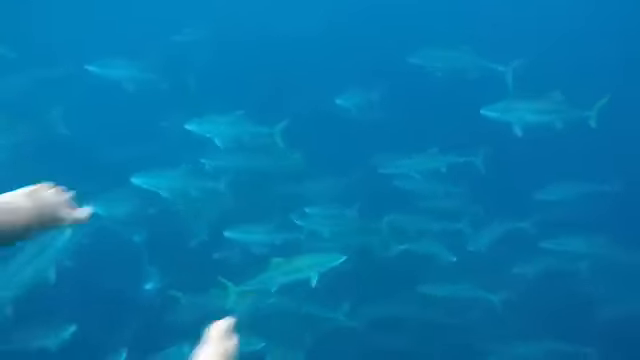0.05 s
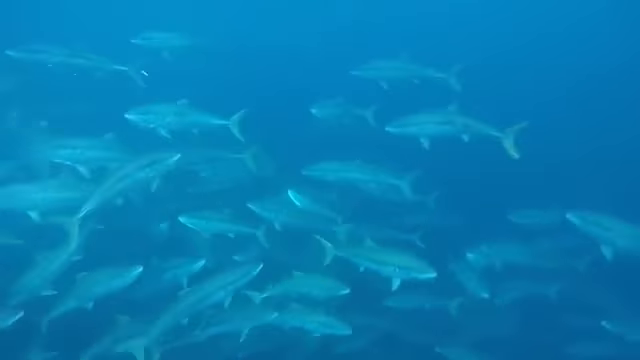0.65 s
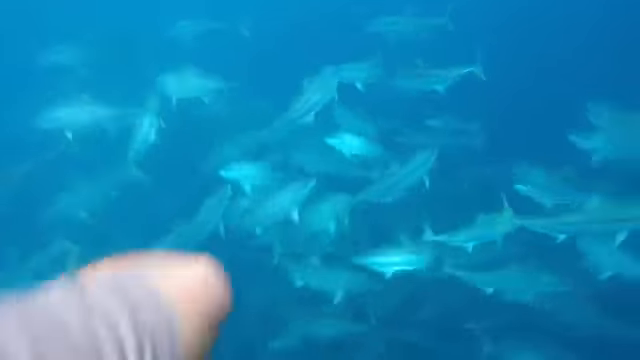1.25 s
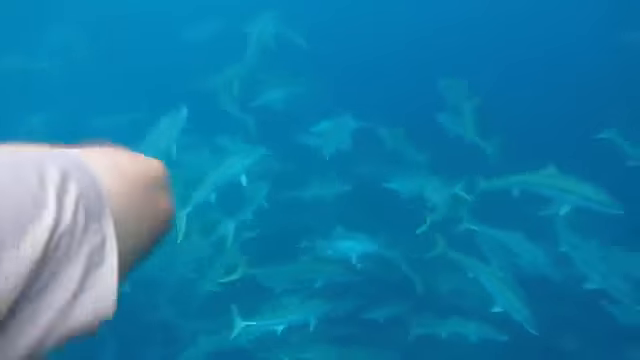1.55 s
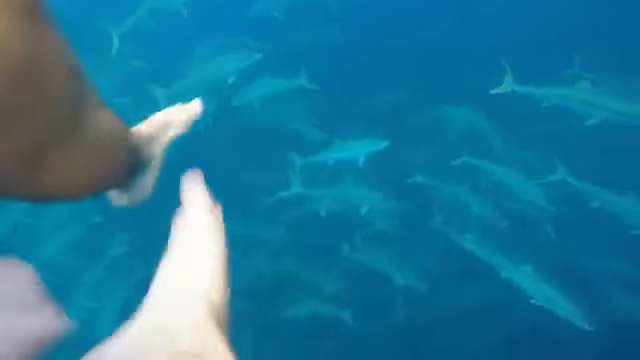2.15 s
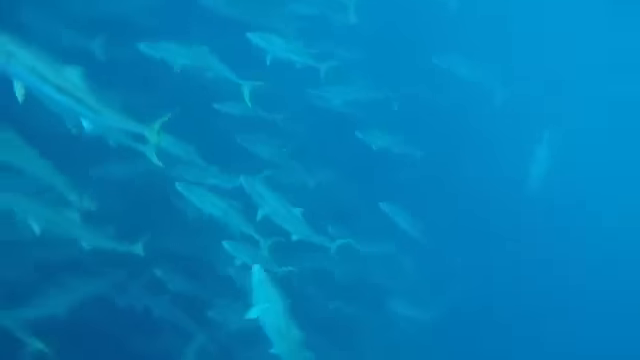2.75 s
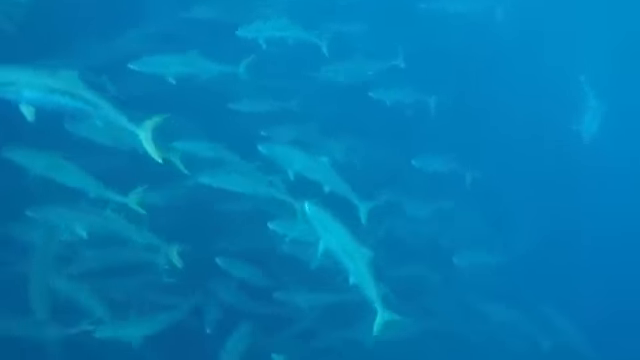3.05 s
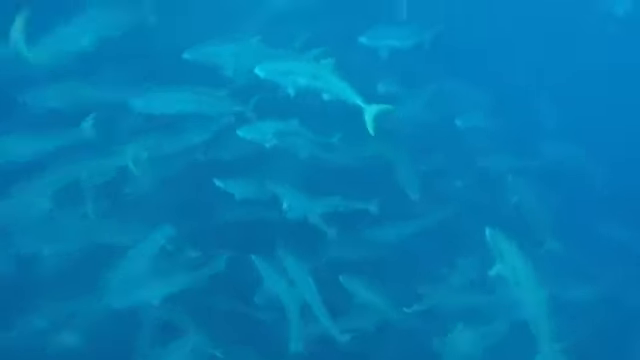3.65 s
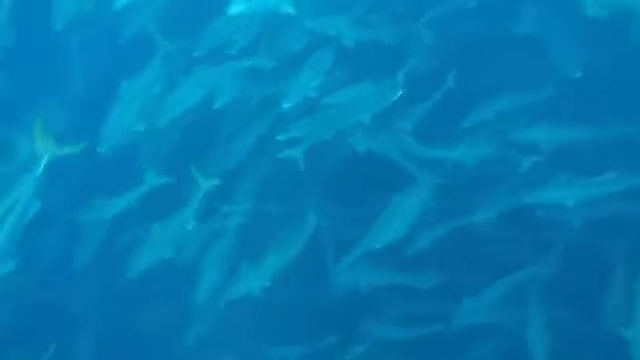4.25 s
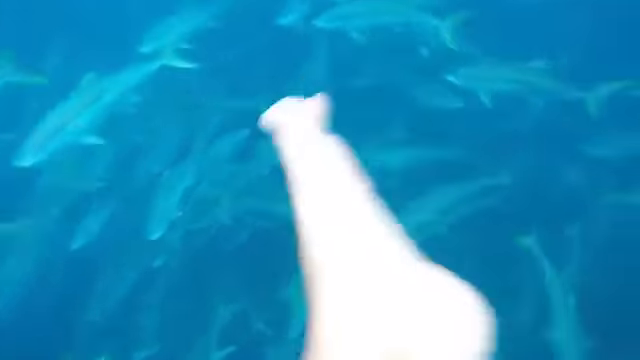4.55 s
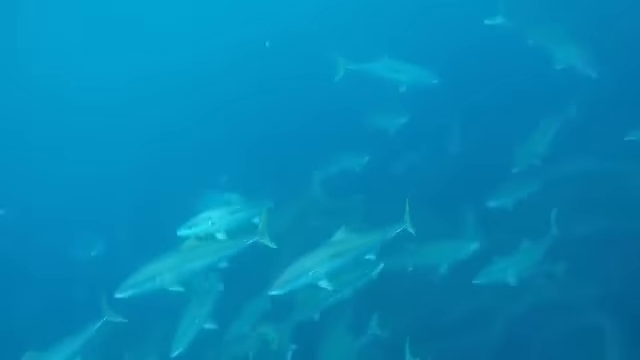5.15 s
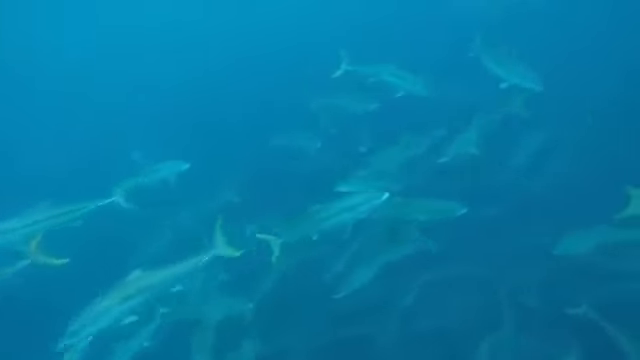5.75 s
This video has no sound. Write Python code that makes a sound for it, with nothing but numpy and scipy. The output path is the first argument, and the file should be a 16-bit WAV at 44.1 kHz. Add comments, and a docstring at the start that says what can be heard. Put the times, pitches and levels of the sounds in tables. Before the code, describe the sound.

A low, muffled underwater rumble runs throughout, heard from a camera in a waterproof case close to a kicking swimmer. Each kick brings an uneven surge and a hollow wash of churned water. Small sharp ticks are scattered all along over a faint, fine fizz.

After a single glug at the start, a bunch of louder glugs and high bubble pips comes from about 0.8 to 1.5 seconds, with the strongest churning near 1.3. Around 2 seconds there is a splutter of small bubbles, a swell of crackle and a short gurgle. The water eases a little, then surges again with soft low bumps and more glugs between 3.1 and 4.4 seconds, heaviest just after 4. At about 4.6 a foot sweeps close with a brief bubbly rush. From 5 seconds the rumble subsides, leaving light fizz and a couple of ticks.

```python
"""Under the sea, a swimmer kicks near a camera in a waterproof case.
Each kick sways the pressure on the case and churns the water, and once a foot sweeps close by.
Pockets of air glug and small bubbles pip, each ringing like a tiny bell. Sharp ticks and the fine
crackle of bubble clouds reach the microphone, coloured by the way the case rings."""
import sys
import numpy as np
from scipy import signal
from scipy.fft import rfft, irfft, next_fast_len
from scipy.io import wavfile
from scipy.ndimage import uniform_filter1d, map_coordinates

SR = 44100
rng = np.random.default_rng(int(sys.argv[2]) if len(sys.argv) > 2 else 0)


def bounce(signal):
    """Save signal as a 16-bit WAV file at the path given by the first command-line argument."""
    frames = np.transpose(np.atleast_2d(signal))
    limited = np.clip(frames, -1, 1)
    pcm = np.round(limited * 32767).astype(np.int16)
    wavfile.write(sys.argv[1], SR, pcm)


N = 255339
TREBLE_HZ = 4600  # where the pips and fizz end and the finest crackle begins
PUSH_RISE_S, CHURN_RISE_S, CLOUD_RISE_S = .51, .38, .36  # every rise or fade time here spans 60 dB

# kicks and sweeps of the limbs: t/s, push level/dB, churn level/dB, fade/s
KICKS = [(.1, -35.5, -42, 1.6), (.88, -41, -41, 2), (1.07, -28.5, -42, 0.6), (1.251, -24.5, -29, 1),
         (1.56, -28.5, -38, 0.7), (1.77, -39, -36.5, 2), (1.94, -24, -39, 0.67), (2.14, -28.5, -33.5, 2.5),
         (2.76, -34, -45, 3), (3.14, -33, -37.5, 1.3), (3.6, -29, -44, 1.5), (3.76, -36, -39.5, 1.7),
         (4.05, -20, -38.5, 0.5), (4.35, -28, -44, 1), (4.591, -22, -39, 0.65), (4.82, -29.5, -49, 1.9),
         (5.2, -35, -51, 2.5)]
# tone of the swaying pressure: f/Hz, level/dB
SWAY_TONE = [(12, -14.5), (28, 6.5), (52, -1), (75, -9), (125, -20), (450, -66)]
# soft bumps of water against the case: t/s, level/dB, f/Hz
WATER_BUMPS = [(1.047, -24, 51), (1.162, -27, 110), (3.228, -22, 82), (3.612, -27, 104), (3.745, -25, 73),
               (4.028, -19, 36), (4.095, -16.5, 42), (4.299, -20, 85), (4.326, -27, 185),
               (4.565, -19.5, 87), (5.14, -29, 89)]

def surge():
    """Swirls from the kicks press unevenly on the case; the strongest bump against it."""
    pushes = [(s, db, 1.3 * fade_s) for s, db, _, fade_s in KICKS]  # swirls outlast the churning
    level_db = swells(pushes, PUSH_RISE_S, calm_db=-43)
    sway = coloured(rng.standard_normal(N), lambda hz: amp(along(SWAY_TONE, hz)))
    strength = np.sqrt(np.abs(uniform_filter1d(sway ** 2, size=SR // 6)) + 1e-12)
    track = amp(level_db + 1.9 * wobble(16)) * sway / strength
    for s, db, hz in WATER_BUMPS:
        add(track, s, amp(db + 11.5) * bubble(hz, fade_s=3.8 / hz, climb_per_s=0, onset_cycles=.5))
    return track


# tone of churned water: f/Hz, level/dB
CHURN_TONE = [(70, -24), (140, 3), (240, -3.5), (400, -2.5), (670, 3), (830, -7), (1060, -19.5),
              (1800, -20), (4500, -46.5)]

def churn(level_db):
    """Stirred water makes a hollow, lumpy wash thick with tiny gulps."""
    gulps = swarm(per_s=260, low_hz=230, high_hz=914, cycles=13.2, spread_db=5.5)
    stirring = rng.standard_normal(N) + amp(-14.5) * gulps
    wash = unit(coloured(stirring, lambda hz: amp(along(CHURN_TONE, hz))))
    return amp(level_db + 2.3 * wobble(28)) * wash


# single large air pockets: t/s, level/dB, f/Hz, fade/s
AIR_POCKETS = [(0.142, -13.5, 520, 0.016), (.579, -33, 750, 0.044), (.866, -13.5, 564, 0.105),
               (.988, -16.5, 661, 0.11), (1.041, -7, 230, 0.016), (1.068, -26, 540, 0.062),
               (1.103, -10.5, 547, 0.03), (1.128, -16, 644, 0.1), (1.131, -23, 765, 0.061),
               (1.234, -11, 386, 0.045), (1.408, -5.5, 470, 0.01), (1.518, -22, 559, 0.12),
               (1.939, -15, 472, 0.018), (2.086, -8.5, 153, 0.03), (2.253, -21, 590, .05),
               (2.601, -25, 775, 0.018), (2.901, -26, 645, 0.042), (3.156, -20.5, 700, 0.07),
               (3.61, -17.5, 324, 0.024), (3.729, -17, 573, .06), (4.03, -13.5, 467, 0.028),
               (4.121, -23.5, 608, 0.038), (4.461, -22, 620, 0.013), (4.539, -22, 576, 0.052),
               (5.633, -28.5, 830, 0.017)]
# pockets that break into a run of bubbles: t/s, level/dB, middle f/Hz, length/s
BUBBLE_RUNS = [(.258, -28, 400, .03), (.883, -24, 600, .055), (2.082, -19.5, 410, .042),
               (2.15, -27, 600, .04), (3.094, -27, 570, .028), (3.705, -22.5, 540, .045)]

def glugs(bubbles_per_s=170, spread_octaves=.27):
    """Air pockets ring as one rising note or break into a gurgle; the case wall softens each start."""
    track = np.zeros(N)
    for s, db, hz, fade_s in AIR_POCKETS:
        add(track, s, amp(db) * bubble(hz, fade_s, climb_per_s=1.9, onset_cycles=.45))
    for s, db, middle_hz, length_s in BUBBLE_RUNS:
        run = rng.uniform(-1, 1, (20, 3))[:round(length_s * bubbles_per_s)]
        for k, (late, pitch, loud) in enumerate(run):
            hz = middle_hz * 2 ** (spread_octaves * np.sqrt(3) * pitch)
            ring = bubble(hz, fade_s=20 / hz, climb_per_s=3, onset_cycles=.7)
            add(track, s + (k + late / 2) / bubbles_per_s, amp(db + 2 * loud) * ring)
    wall = lambda hz: 1 / np.sqrt(1 + (hz / 930) ** 20) + amp(case_db(hz) - 12)
    return coloured(track * (1 + .22 * wobble(260)), wall)


# small bubbles: t/s, level/dB, f/Hz
SMALL_BUBBLES = [(.849, -23.5, 1890), (.899, -24, 3020), (0.981, -26, 1710), (1.104, -27, 1860),
                 (1.225, -22.5, 1920), (1.33, -26.5, 2590), (1.367, -23, 2230), (1.895, -23.5, 1650),
                 (1.905, -24, 1740), (1.929, -23, 1880), (1.929, -17.5, 3100), (1.941, -22, 3250),
                 (1.944, -19, 2660), (1.968, -20.5, 2800), (1.97, -28, 1390), (1.985, -27, 1780),
                 (2.031, -24, 2490), (2.179, -27, 1500), (2.267, -25.5, 1590), (3.703, -24, 1810),
                 (3.738, -21, 2180), (4.121, -26.5, 1400), (4.575, -21.5, 2180)]

def pips(echo_fade_s=.05):
    """Small bubbles splutter: wobbling walls roughen each ring and the cloud around scatters it."""
    track, t = np.zeros(N), np.arange(SR // 10) / SR
    for s, db, hz in SMALL_BUBBLES:
        ring = bubble(hz, fade_s=45 / hz, climb_per_s=5, onset_cycles=.3)
        echo = rng.standard_normal(len(t)) * amp(-60 * t / echo_fade_s)
        direct_and_echo = (t == 0) + amp(-8) * echo / np.linalg.norm(echo)
        add(track, s, amp(db) * signal.fftconvolve(ring, direct_and_echo))
    rough = track * (1 + .3 * wobble(1100))
    return coloured(rough, lambda hz: 1 / np.sqrt(1 + (hz / TREBLE_HZ) ** 10))


# loudness of the passing foot: t/s, level/dB
FOOT_SWEEP = [(4.49, -70), (4.54, -35), (4.6, -31), (4.68, -37.5), (4.86, -41.5), (5.02, -63)]
# tone of its stream: f/Hz, level/dB
STREAM_TONE = [(170, 0.5), (680, 1), (900, -8), (1180, -23), (2100, -11.5), (3000, -22), (12000, -65)]

def foot_rush():
    """A foot sweeps close by: a bubbly stream that swells quickly and slackens slowly."""
    level_db = np.interp(np.arange(N) / SR, *np.transpose(FOOT_SWEEP))
    bubbles = swarm(per_s=450, low_hz=250, high_hz=2500, cycles=14, spread_db=3)
    tone = lambda hz: amp(along(STREAM_TONE, hz))
    flow = unit(coloured(rng.standard_normal(N), tone))
    return amp(level_db) * unit(flow + unit(coloured(bubbles, tone)))


# sharp ticks and bright pin-prick snaps, heard through the case: t/s, level/dB, brightness/(dB per octave)
SHARP_TICKS = [(0.158, -37.5, -4.5), (0.317, -37, -3.5), (.372, -38, -3), (0.412, -33, 2.5),
               (0.787, -33.5, -1), (0.847, -29, -1), (1.05, -34, 1.5), (1.155, -38.5, 7), (1.225, -31, 4.5),
               (1.387, -27.5, 5), (1.512, -43, 11.5), (1.736, -37, 4), (1.775, -34, 3.5), (1.85, -35, 6.5),
               (1.861, -30, 5.5), (2.204, -31.5, 3), (2.334, -31, 3), (2.577, -28, 9), (2.793, -44.5, 12),
               (2.906, -33.5, -1), (2.981, -45, 15), (3.047, -32, .5), (3.439, -38.5, 4.5), (3.49, -38, -8),
               (3.564, -38.5, 8.5), (3.605, -40.5, 12.5), (3.696, -29.5, -4.5), (3.845, -44, 14),
               (4.057, -36.5, 0.5), (4.111, -27.5, 5), (4.195, -39, 4.5), (4.46, -33, -3.5), (4.611, -37, 3),
               (4.848, -40.5, 7), (5.03, -38.5, 5), (5.132, -39, -3), (5.485, -26, 2.5), (5.6, -31, 2.5)]

def ticks():
    """Each tick is a snap and a brief scatter off the surface, coloured by its own path to the case."""
    track, t = np.zeros(N), np.arange(SR // 6) / SR
    grid_hz = np.linspace(0, 16000, 48)
    for s, db, brightness in SHARP_TICKS:
        snap = 3 * (t == 0) + amp(-60 * t / .0042) * rng.standard_normal(len(t))
        scatter = (amp(-13 - 60 * t / .024) + amp(-22 - 60 * t / .23)) * rng.standard_normal(len(t))
        path_db = rng.normal(0, 3, len(grid_hz))
        tilt_db = lambda hz: brightness * np.log2(np.clip(hz, 800, 9000) / 3000)
        tone = lambda hz: amp(case_db(hz) + tilt_db(hz) + np.interp(hz, grid_hz, path_db))
        tick = coloured(snap + scatter, tone)
        add(track, s, amp(db + 24) * tick / np.linalg.norm(tick))
    return track


# clouds of small bubbles passing the case: t/s, level/dB, fade/s
BUBBLE_CLOUDS = [(.04, -47, 1), (.41, -46, .5), (.62, -46, .5), (.86, -42, 1.9), (1.3, -42, 2.8),
                 (1.93, -37.5, 1.13), (2.22, -45, 5.5), (2.8, -49, 8), (3.04, -42, 0.4), (3.45, -44.5, 0.3),
                 (3.72, -42.5, 0.77), (4.12, -49.5, 1.7), (5.14, -52.5, 3.5), (5.6, -45, 1.3)]

def crackle(churn_db):
    """Far bubbles blur into a fizz; near ones burst one by one, or plink while the high ring lasts."""
    cloud_db = swells(BUBBLE_CLOUDS, CLOUD_RISE_S, calm_db=-56.5)
    fizz_db = 20 * np.log10(np.hypot(amp(cloud_db), amp(churn_db - 22.5)))  # churning sheds fizz too
    spray_db = -57 + .38 * (fizz_db + 45)  # the finest crackle swells less than the fizz
    bursts = unit(swarm(per_s=70, low_hz=1550, high_hz=3700, cycles=24, spread_db=4.5) * wobble(1300))
    spits = unit(swarm(per_s=70, low_hz=6500, high_hz=12500, cycles=50, spread_db=5.5) * wobble(2400))
    plinks = swarm(per_s=220, low_hz=1200, high_hz=4400, cycles=24, spread_db=4.5)
    lows = lambda hz: amp(case_db(hz)) / np.sqrt(1 + (hz / TREBLE_HZ) ** 20)
    highs = lambda hz: amp(case_db(hz)) / np.sqrt(1 + (TREBLE_HZ / (hz + 1)) ** 20)
    hiss = amp(2 * wobble(45)) * rng.standard_normal(N)
    sizzle = unit(unit(coloured(hiss, lows)) + amp(-1.5) * bursts)
    spray = unit(unit(coloured(hiss, highs)) + amp(-5) * unit(coloured(spits, highs)))
    plink_share = np.interp(swells(HIGH_RING, CLOUD_RISE_S, calm_db=-80), [-72, -58], [.05, .62])
    fizz = np.sqrt(1 - plink_share) * sizzle + np.sqrt(plink_share) * unit(coloured(plinks, lows))
    return amp(fizz_db) * fizz + amp(spray_db) * spray


# swells of the high ring: t/s, level/dB, fade/s
HIGH_RING = [(.02, -61.5, 6), (.88, -57, 8), (1.9, -50.5, 1.1), (2.35, -56.5, 2.2)]

def singing():
    """A thin, high ring near 5.3 kHz flickers and swells, with a fainter sparkle above it, and dies away after
    about 2.8 s."""
    ring = swarm(per_s=260, low_hz=5050, high_hz=5600, cycles=70, spread_db=3)
    sparkle = swarm(per_s=400, low_hz=11000, high_hz=13200, cycles=45, spread_db=3)
    return amp(swells(HIGH_RING, CLOUD_RISE_S, calm_db=-90)) * (ring + amp(-14.5) * sparkle)


# what the case lets through: f/Hz, level/dB
CASE_TONE = [(500, -36), (850, 8.5), (1070, -6.5), (1400, -.5), (1750, 7), (2300, 3), (2870, 4.5),
             (3350, -1.5), (4050, 1), (4550, -10.5), (5220, -12.5), (6600, -19.5), (8600, -19),
             (10300, -27.5), (15000, -36)]

def case_db(hz):
    """The case boosts the pitches it rings at and muffles the rest."""
    return along(CASE_TONE, hz)


def bubble(hz, fade_s, climb_per_s, onset_cycles):
    """A pinched-off bubble rings and fades while its pitch climbs steadily."""
    t = np.arange(SR // 6) / SR
    phase = 2 * np.pi * hz * (t + climb_per_s * t ** 2 / 2)
    return np.sin(phase) * amp(-60 * t / fade_s) * (1 - np.exp(-t * hz / onset_cycles))


def swarm(per_s, low_hz, high_hz, cycles, spread_db):
    """Bubbles at random times, each ringing for some cycles at its own pitch."""
    when, pitch, loud, life = rng.random((int(per_s * N / SR), 4)).T[:, :, None]
    hz = low_hz * (high_hz / low_hz) ** pitch
    step = np.arange(int(min(2 * cycles / low_hz, .05) * SR))
    turns = hz * step / SR
    strength = amp(-spread_db * np.log(1 - .96 * loud)) * np.sqrt(hz)  # many quiet, a few loud
    fade = amp(-60 * turns / (cycles * (.5 + life)))
    rings = strength * np.sin(2 * np.pi * turns) * fade * (1 - np.exp(-turns))
    positions = (when * N).astype(int) + step
    return unit(np.bincount(positions.ravel(), rings.ravel(), N)[:N])


def swells(rows, rise_s, calm_db):
    """Level in dB of overlapping swells, each rising and dying away over a calm background."""
    t = np.arange(N) / SR
    power = amp(calm_db) ** 2
    for s, db, fade_s in rows:
        power = power + amp(db) ** 2 * 1e-6 ** np.maximum((s - t) / rise_s, (t - s) / fade_s)
    return 10 * np.log10(power)


def wobble(per_s):
    """A smooth curve through this many random points a second."""
    return map_coordinates(rng.standard_normal(int(N * per_s / SR) + 4), [np.arange(N) * per_s / SR])


def coloured(x, gain):
    """Turn each frequency of x up or down by gain(hz)."""
    size = 2 * next_fast_len(len(x) // 2 + 4096)
    cepstrum = irfft(np.log(np.maximum(gain(np.fft.rfftfreq(size, 1 / SR)), 1e-6)))
    cepstrum[1:size // 2] *= 2  # folded so that ringing comes after a sound, never before
    cepstrum[size // 2 + 1:] = 0
    return irfft(rfft(x, size) * np.exp(rfft(cepstrum)), size)[:len(x)]


def along(tone, hz):
    """Read a tone table's level at any frequency."""
    f, db = np.transpose(tone)
    return np.interp(np.log(hz + 1), np.log(f + 1), db)


def amp(db):
    """Turn decibels into a multiplier."""
    return 10 ** (np.asarray(db) / 20)


def unit(x):
    """Scale x to an average power of 1."""
    return x / np.sqrt(np.mean(x ** 2) + 1e-20)


def add(track, s, sound):
    """Mix a sound into the track at s seconds."""
    part = track[max(0, round(s * SR)):][:len(sound)]
    part += sound[:len(part)]


def scene():
    """The kicks churn the water, the churning feeds the fizz, and all sounds mix into one channel."""
    churn_db = swells([(s, db, fade_s) for s, _, db, fade_s in KICKS], CHURN_RISE_S, calm_db=-57.5)
    water = surge() + churn(churn_db) + foot_rush()
    return (water + glugs() + pips() + ticks() + crackle(churn_db) + singing())[None]


def record(dry, top_hz=15400):
    """The camera keeps nothing above its highest frequency."""
    size = next_fast_len(N + SR // 4)
    return irfft(rfft(dry, size) * (np.fft.rfftfreq(size, 1 / SR) < top_hz), size)[:, :N]


dry = scene()
out = record(dry)
bounce(out)
```